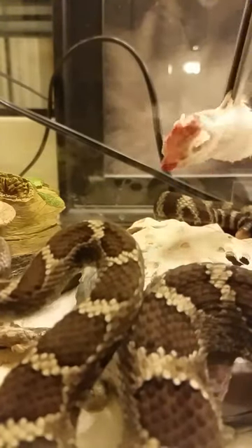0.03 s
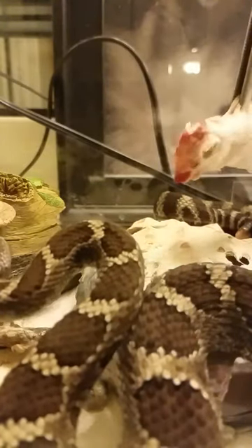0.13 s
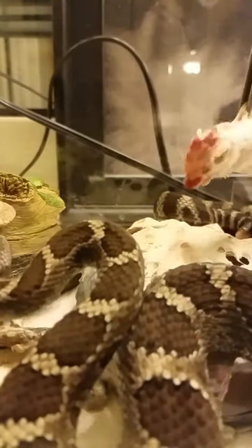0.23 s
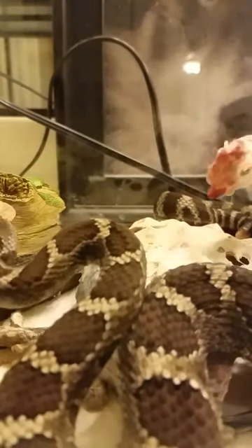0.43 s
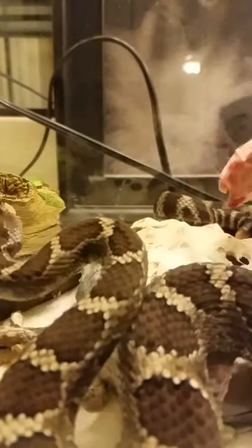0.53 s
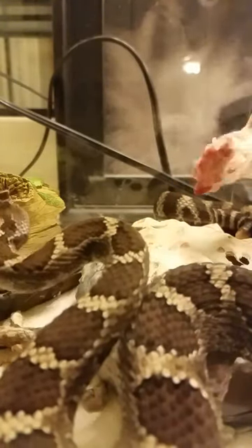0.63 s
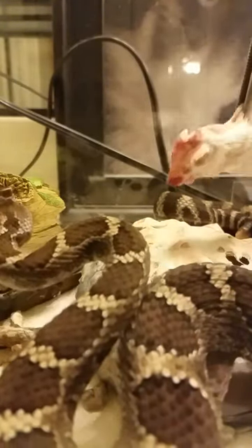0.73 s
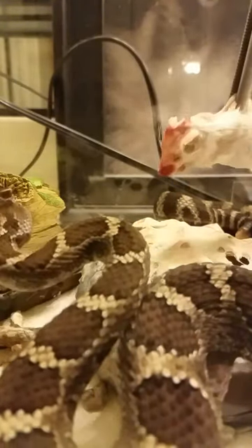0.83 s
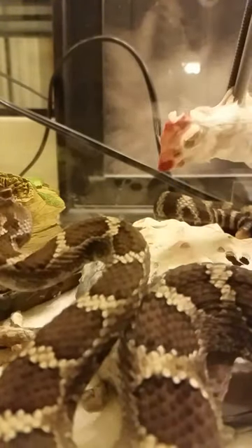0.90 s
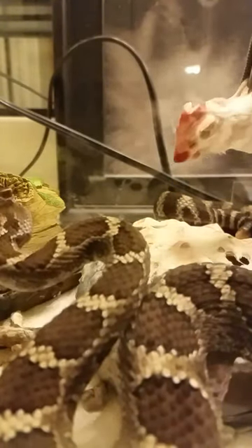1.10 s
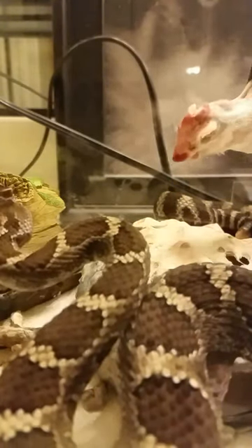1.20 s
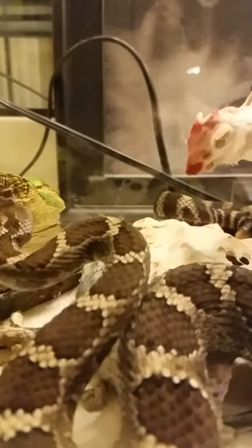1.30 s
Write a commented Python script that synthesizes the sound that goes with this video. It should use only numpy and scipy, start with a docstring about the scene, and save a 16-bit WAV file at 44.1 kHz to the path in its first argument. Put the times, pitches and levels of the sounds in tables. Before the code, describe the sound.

One dull bump against a glass tank lands close up at about 0.2 seconds, with a low boom, a tick and a brief rattle of frame and glass. The tank settles with a soft knock around 0.3 seconds and quickly rings out. Near 0.9 seconds comes a very faint, thin whistle, perhaps a distant bird. Soft air, a fan and a wavering electrical hum fill the quiet room throughout.

```python
"""One dull bump against a glass tank, heard close up in a quiet room.
Soft air, a fan and a wavering mains hum run from the start. At 0.21 s the bump lands: the panels
boom, contact ticks, frame and glass rattle briefly, the room answers and the stand shudders.
The tank settles back with a soft knock and rings out. Around 0.9 s comes one faint, thin
whistle, perhaps a distant bird."""
import sys
import numpy as np
from scipy import signal
from scipy.fft import rfft, irfft
from scipy.io import wavfile
from scipy.ndimage import uniform_filter1d

SR = 44100
rng = np.random.default_rng(int(sys.argv[2]) if len(sys.argv) > 2 else 0)


def transcribe(u):
    """Save the signal u as a 16-bit wav file named by the first command-line argument.

    u: samples, shape (n,) or (channels, n), limited to [-1, 1]; the rate is SR.
    q: integer samples, one column per channel.
    """
    v = np.clip(np.atleast_2d(u).T, -1, 1)
    q = np.round(v * 32767).astype(np.int16)
    wavfile.write(sys.argv[1], SR, q)


N = 59535

BUMP_S = .2112
LEFT_LAG_S = 0.000206  # the right microphone hears the tank first
# The room's stereo image. Each row: frequency in Hz, left-right correlation, left minus right in dB.
ROOM_IMAGE = [(59.5, 1, -3), (122, 0.94, -3.5), (355, 0.92, 0.5), (650, 0.96, -6.5), (1310, -0.63, -1.5),
              (2280, 0.051, 0), (7000, -0.045, -3.1), (14000, 0, 2)]


def undb(db):
    """Decibels to gain."""
    return 10 ** (np.asarray(db) / 20)


def unit(x):
    """Scale to rms 1."""
    return x / np.sqrt(np.mean(x ** 2))


def pan(db):
    """Stereo gains for a left minus right level difference."""
    return undb(np.array([[1], [-1]]) * db / 2)


def along(hz, table, column=1):
    """Read one column of a table on a log-frequency axis."""
    rows = np.array(table, float)
    return np.interp(np.log(hz + 1e-9), np.log(rows[:, 0]), rows[:, column])


def since(start):
    """Seconds since a moment, zero before it."""
    return np.maximum(np.arange(N) / SR - start, 0)


def fade(age, t60):
    """Exponential decay by 60 dB in t60 seconds."""
    return np.exp(-np.log(1000) * age / t60)


def attack(age, rise_s):
    """Exponential swell from 0 towards 1."""
    return 1 - np.exp(-age / rise_s)


def drift(rate_hz):
    """Smooth random motion of rms 1."""
    hold = int(SR / rate_hz)
    steps = np.repeat(rng.standard_normal(N // hold + 1), hold)
    return unit(uniform_filter1d(uniform_filter1d(steps, hold), hold)[:N])


def freqs():
    """Frequencies of the spectrum bins in Hz."""
    return np.arange(N // 2 + 1) * SR / N


def noise(colour, correlation, lag_s=0):
    """Stereo noise of rms 1 with a given spectrum, left-right correlation and lag of the left side."""
    mid, side = rfft(rng.standard_normal((2, N)))
    alike = np.clip(correlation, -1, 1)
    stereo = np.sqrt(1 + alike) * mid + np.sqrt(1 - alike) * side * np.array([[1], [-1]])
    delay = np.exp(-2j * np.pi * freqs() * np.array([[lag_s], [0]]))
    return unit(irfft(colour * delay * stereo, N))


def resonance(hz, width_hz):
    """Gain curve of a steep resonance."""
    return 1 / (1 + ((freqs() - hz) / width_hz) ** 2) ** 2


def burst(band, envelope):
    """Enveloped noise, scaled to the envelope's rms."""
    return unit(band * envelope) * np.sqrt(np.mean(envelope ** 2))


def air():
    """Moving air lays down a dark, gently breathing bed."""
    # Each row: frequency in Hz, relative noise density in dB.
    spectrum = [(25, -34), (54, -21), (85, -21.5), (120, -10.5), (160, -19), (240, -10.5), (305, -16),
                (440, -13.5), (700, -19), (900, -19), (1290, -21.5), (2500, -31), (5000, -38.5),
                (6000, -45), (7070, -41.5), (9500, -43), (14500, -38.5)]
    colour = undb(along(freqs(), spectrum)) * pan(along(freqs(), ROOM_IMAGE, column=2))
    return undb(-57) * noise(colour, along(freqs(), ROOM_IMAGE)) * undb(.5 * drift(rate_hz=11))


def fan():
    """A fan drones in narrow bands of noise, with a faint hiss on top."""
    # Each row: pitch in Hz, width in Hz, level in dB.
    tones = [(247.1, 10.5, -64), (490, 6.7, -73), (833, 3.2, -80.5), (805.3, 7.2, -69.5), (841, 4.4, -72),
             (5865, 550, -78)]
    out = 0
    for hz, width, db in tones:
        band = noise(resonance(hz, width), along(hz, ROOM_IMAGE))
        out = out + undb(db) * pan(along(hz, ROOM_IMAGE, column=2)) * band
    return out


def mains_hum(hz=120.2, waver=0.0089):
    """One low mains tone that wavers in pitch and level."""
    # Each row: time in seconds, level in dB.
    swells = [(0, -75), (0.119, -68), (.37, -56), (.44, -56.5), (.54, -58.5), (0.629, -63.5), (.76, -54.5),
              (.92, -53.5), (1.06, -61), (1.12, -67), (1.19, -60), (1.35, -64)]
    phase = 2 * np.pi * np.cumsum(hz * (1 + waver * drift(rate_hz=7.2))) / SR
    gain = undb(np.interp(since(0), *np.array(swells).T))
    return np.sqrt(2) * gain * np.sin(phase)


def panel_boom(start, cutoff_hz):
    """The panel modes swell and die away; a softer push, with a lower cutoff, spares the high ones."""
    # Each row: pitch in Hz, relative level in dB, T60 and attack in seconds, left minus right in dB.
    modes = [(52, -48, 0.28, 0.0056, 6), (73.7, -53, 0.51, 0.0058, 16), (133.6, -22, 0.258, 0.015, 7),
             (177.8, -18, 0.25, 0.0024, -2.5), (213, -12.5, 0.097, 0.0028, -1.5), (245, -25, 0.37, 0.02, 3),
             (259.4, -19, 0.29, 0.013, -1), (276.4, -22, 0.23, 0.007, -1.5), (301, -30.5, 0.097, 0.0027, 9),
             (432, -16, 0.12, .003, -2), (490.4, -25, 0.22, 0.0054, -2), (523.6, -30.5, 0.18, 0.0012, -7),
             (554.5, -26.5, 0.14, 0.0016, 11.5), (619.2, -31.5, 0.24, 0.0038, -16),
             (668.2, -29.5, 0.15, 0.0017, 7.5), (929, -32.5, 0.21, 0.00095, -4),
             (985, -31.5, 0.12, 0.0018, -12.5), (1160, -45, 0.068, .001, 15), (1270, -40, 0.25, 0.0014, 1),
             (1464, -49, 0.4, .001, 7)]
    age = np.array([since(start + LEFT_LAG_S), since(start)])
    out = 0
    for k, (hz, db, t60, rise_s, side_db) in enumerate(modes):
        polarity = (-1) ** k  # neighbouring modes swing in opposite directions
        gain = undb(db) / (1 + (hz / cutoff_hz) ** 4)
        envelope = attack(age, rise_s) * fade(age, t60)
        out = out + polarity * gain * pan(side_db) * envelope * np.sin(2 * np.pi * hz * age)
    return out


def contact_tick(decay_s=.003):
    """First contact gives a short, bright snap of noise."""
    age = since(BUMP_S)
    band = noise(resonance(hz=2420, width_hz=2360), correlation=0.18)
    return undb(-36) * pan(-7.5) * burst(band, (age > 0) * np.exp(-age / decay_s))


def frame_rattle(direct_db=0.5, direct_decay_s=0.0024):
    """Crowded resonances of frame and glass: a strong direct wave, then a short ring."""
    # Each row: centre and width in Hz, level in dB, T60 in seconds, left minus right in dB.
    clusters = [(475, 202, -28, 0.21, -2), (816, 210, -48.5, 0.12, -18), (952, 60, -34.5, 0.12, -4),
                (1199, 110, -31.5, 0.091, 6), (1445, 270, -35.5, 0.13, -4.5), (2150, 200, -36, 0.052, -17),
                (2243, 170, -39.5, 0.14, 3), (2640, 1200, -44, 0.13, -10), (3430, 290, -43, 0.067, -1.5),
                (4300, 640, -57.5, 0.18, -2), (5034, 150, -56, 0.076, -11.5),
                (5740, 90, -54.5, 0.027, -13.5), (11000, 4000, -62, .03, -9)]
    age = since(BUMP_S)
    onset = attack(age, rise_s=0.0012) * (1 + undb(direct_db) * np.exp(-age / direct_decay_s))
    out = 0
    for hz, width, db, t60, side_db in clusters:
        band = noise(resonance(hz, width), correlation=0.48, lag_s=LEFT_LAG_S)
        out = out + undb(db) * pan(side_db) * burst(band, onset * fade(age, t60))
    return out


def room_tail():
    """The small room answers the bump with a dull, even wash."""
    # Each row: frequency in Hz, relative noise density in dB.
    spectrum = [(100, -14), (450, 18.5), (1400, 8), (2600, -4.5), (5000, -20), (8000, -42), (14000, -59)]
    age = since(BUMP_S)
    wash = noise(undb(along(freqs(), spectrum)), along(freqs(), ROOM_IMAGE))
    return undb(-41) * wash * attack(age, rise_s=0.0039) * fade(age, t60=0.54)


def stand_shudder():
    """The stand shakes under the tank: a faint, deep rumble that outlasts the bump."""
    age = since(BUMP_S)
    rumble = noise(resonance(hz=58, width_hz=32), correlation=0.7)
    return undb(-54.5) * pan(2.2) * burst(rumble, attack(age, rise_s=0.011) * fade(age, t60=1))


def settling_knock():
    """The tank settles back and softly sounds its panels again."""
    # Each row: start in seconds, level in dB relative to the bump, cutoff in Hz.
    knocks = [(0.2986, -25, 600)]
    return sum(undb(db) * panel_boom(start, cutoff_hz) for start, db, cutoff_hz in knocks)


def whistle(flutter_db=2.5, jitter=.007, echo_db=-15):
    """A thin, arching, fluttering tone off to the right, with a little echo."""
    # Each row: time in seconds, pitch in Hz, level in dB.
    contour = [(0.894, 7500, -86), (.914, 8050, -79), (0.938, 8640, -78.5), (.965, 8680, -80.5),
               (1.018, 8080, -75), (1.073, 8060, -78.5), (1.102, 7620, -85), (1.11, 7430, -102)]
    times, hz, db = np.array(contour).T
    t = since(0)
    gate = (t > times[0]) * (t < times[-1])
    gain = gate * undb(np.interp(t, times, db) + flutter_db * drift(rate_hz=460))
    pitch = np.interp(t, times, hz) * (1 + jitter * drift(rate_hz=700))
    tone = np.sqrt(2) * gain * np.sin(2 * np.pi * np.cumsum(pitch) / SR)
    room = unit(rng.standard_normal((2, N)) * fade(t, t60=0.27)) / np.sqrt(N)
    echo = signal.fftconvolve(tone[None], room, axes=1)[:, :N]
    return pan(-10) * (tone + undb(echo_db) * echo)


def scene():
    """The bump, its settling and the late whistle over the quiet room."""
    boom = undb(-3.5) * (panel_boom(BUMP_S, cutoff_hz=4000) + settling_knock())
    damping = fade(since(.322), t60=0.18)  # the ring dies faster once the tank is at rest
    tank = (boom + frame_rattle()) * damping
    bump = tank + contact_tick() + stand_shudder() + room_tail()
    return bump + air() + fan() + mains_hum() + whistle()


def record(dry):
    """A steep low-pass cuts the highest treble."""
    return signal.sosfilt(signal.ellip(10, .2, 70, 14650, fs=SR, output="sos"), dry)


dry = scene()
out = record(dry)
transcribe(out)
```